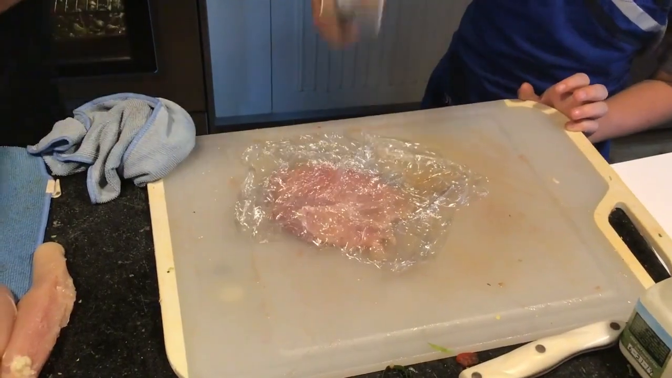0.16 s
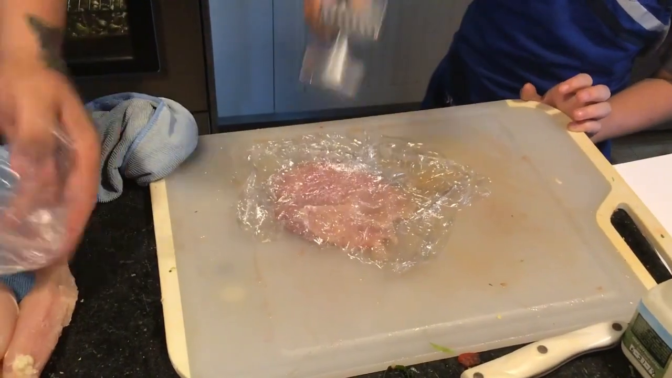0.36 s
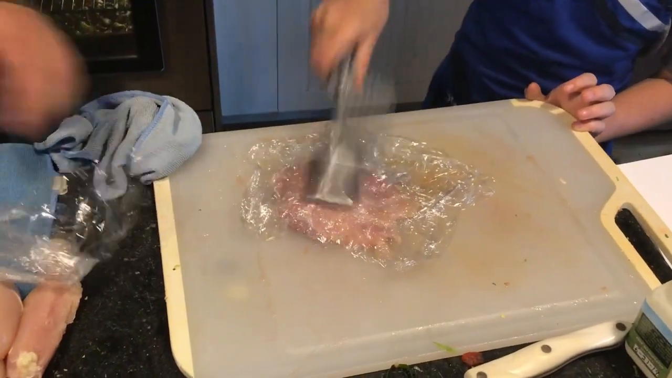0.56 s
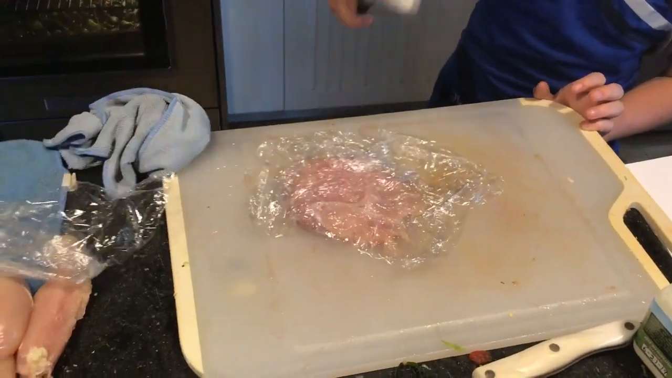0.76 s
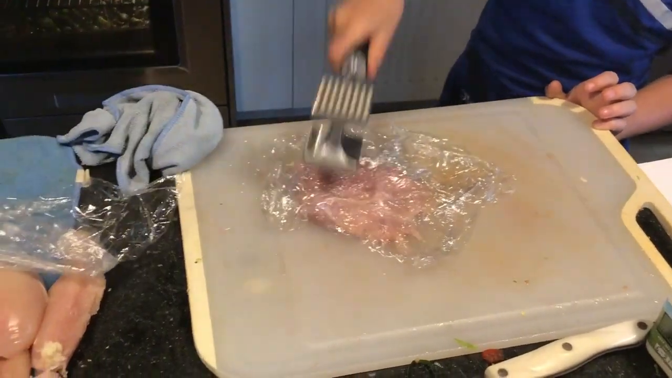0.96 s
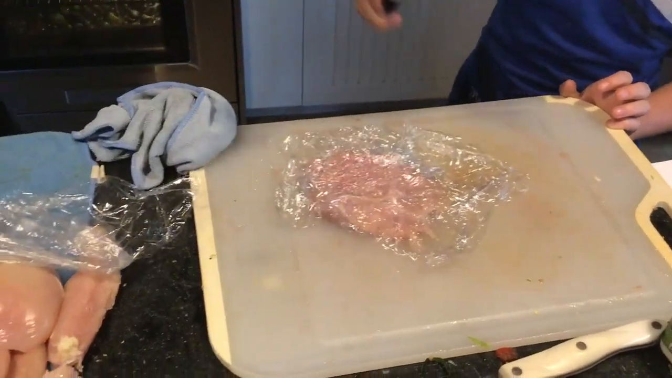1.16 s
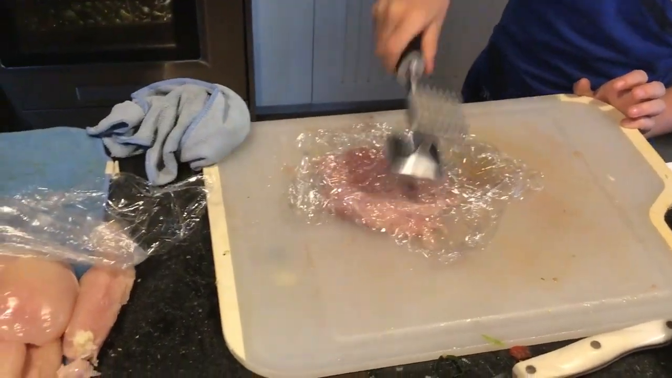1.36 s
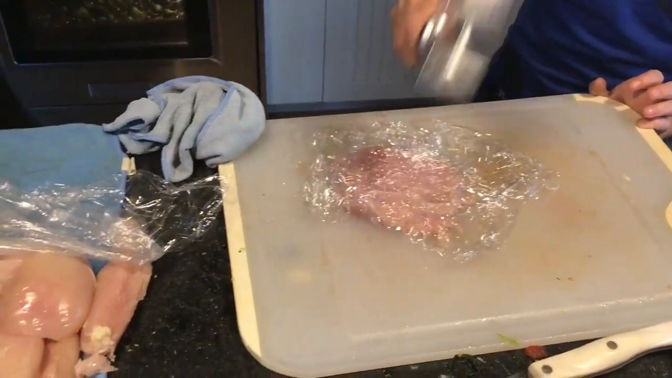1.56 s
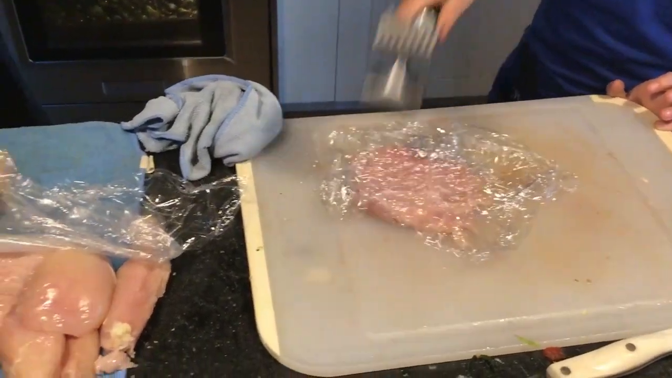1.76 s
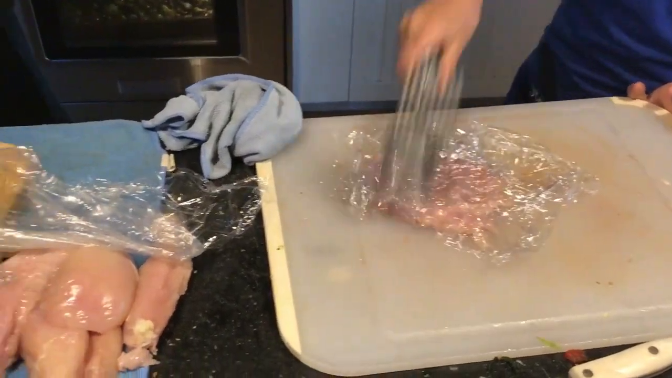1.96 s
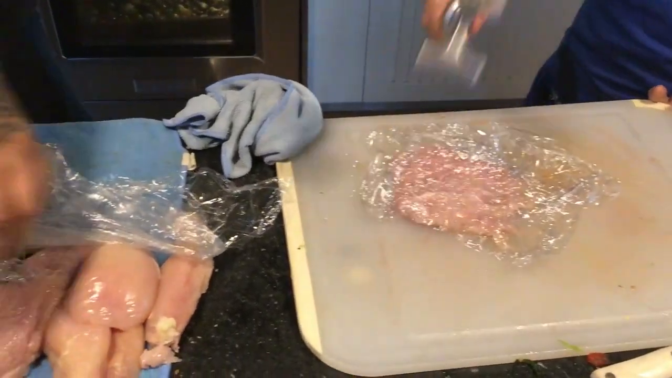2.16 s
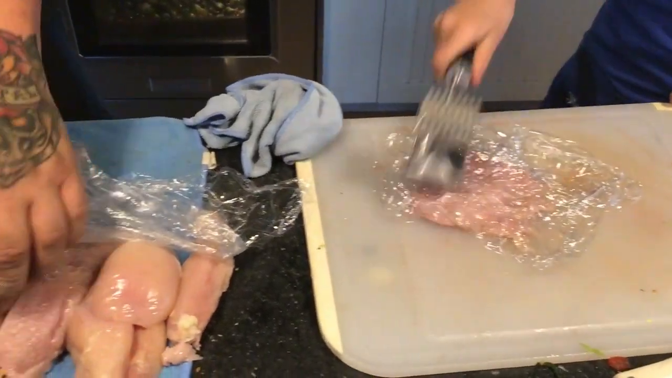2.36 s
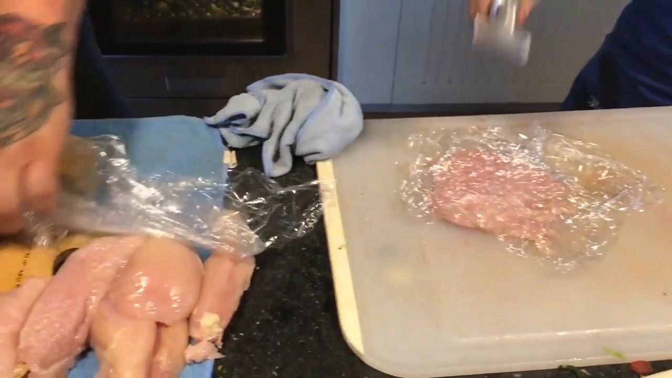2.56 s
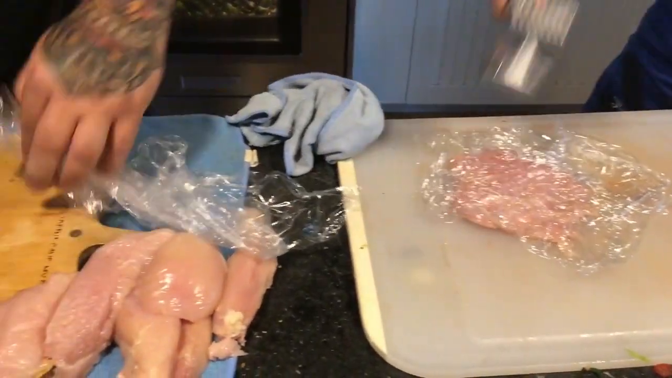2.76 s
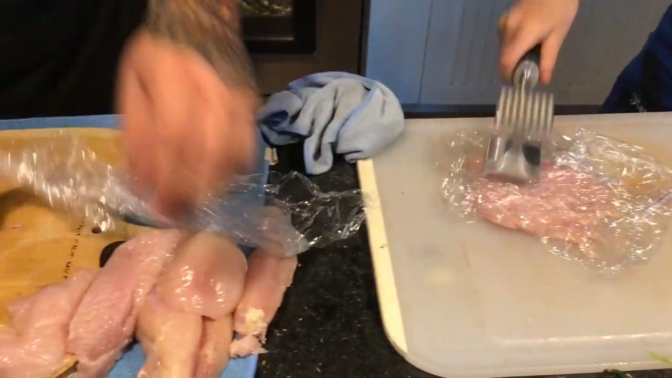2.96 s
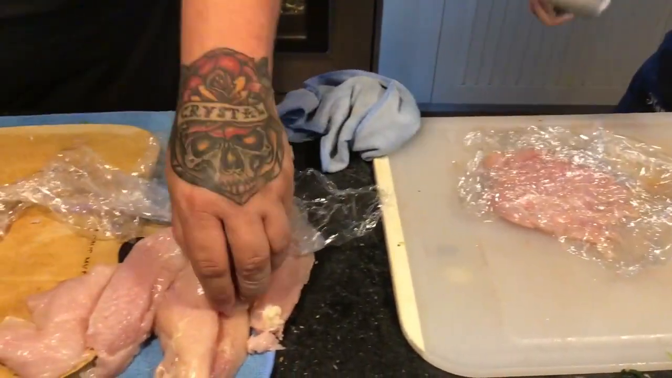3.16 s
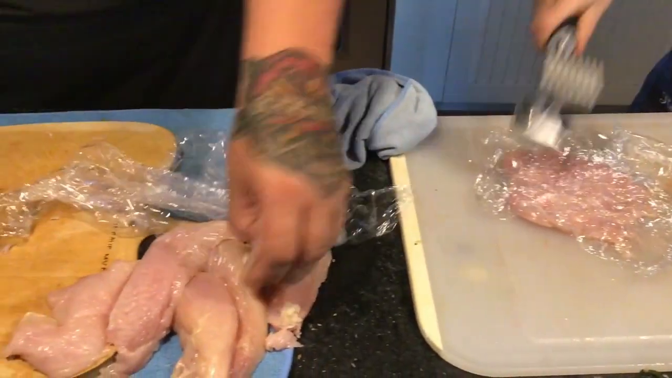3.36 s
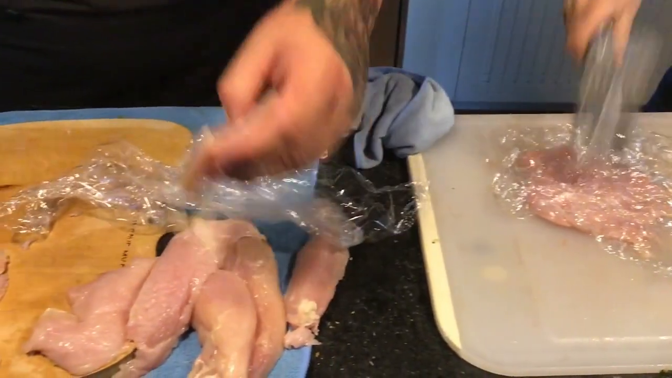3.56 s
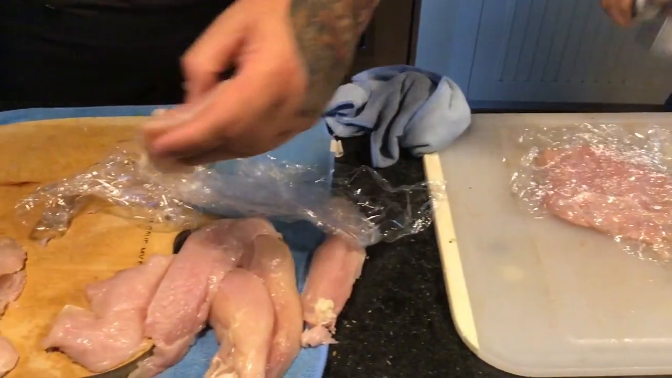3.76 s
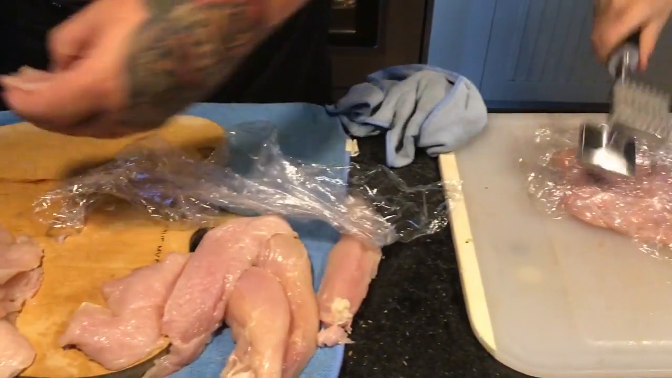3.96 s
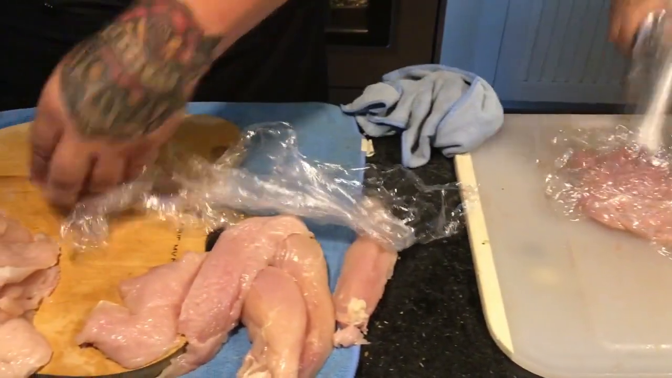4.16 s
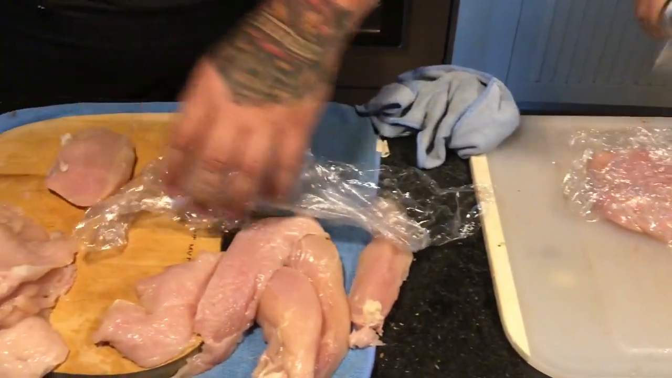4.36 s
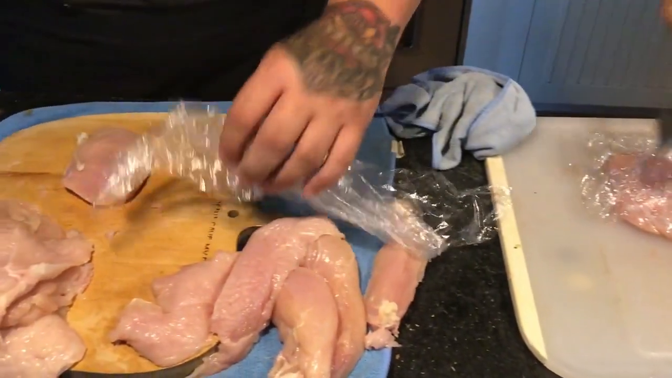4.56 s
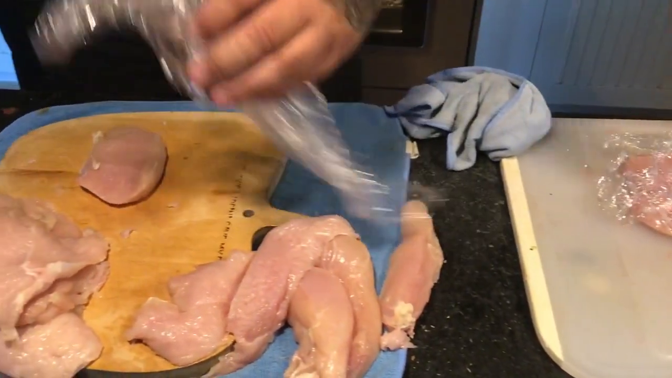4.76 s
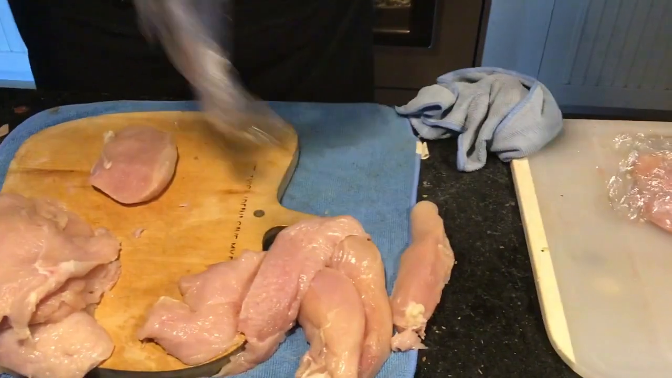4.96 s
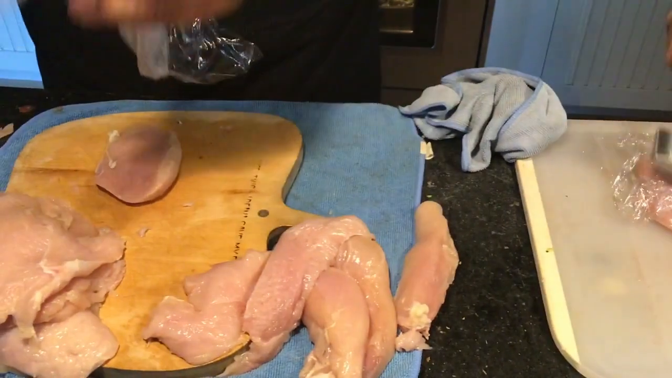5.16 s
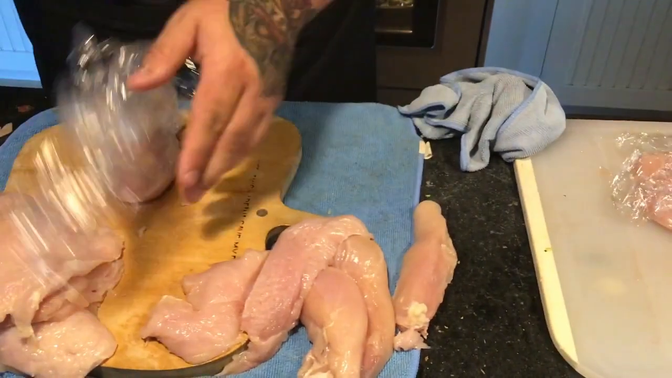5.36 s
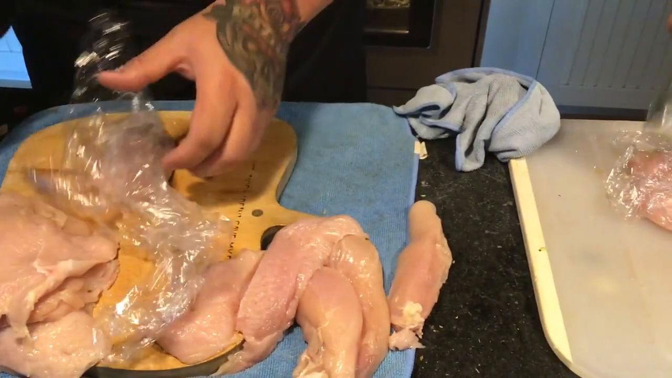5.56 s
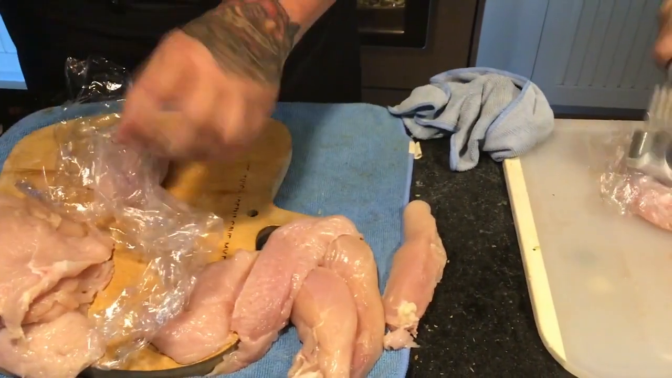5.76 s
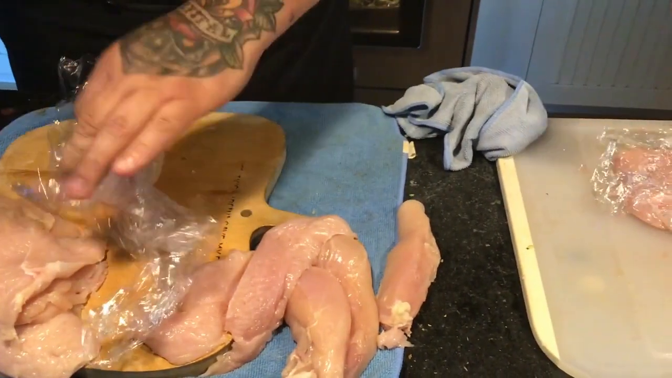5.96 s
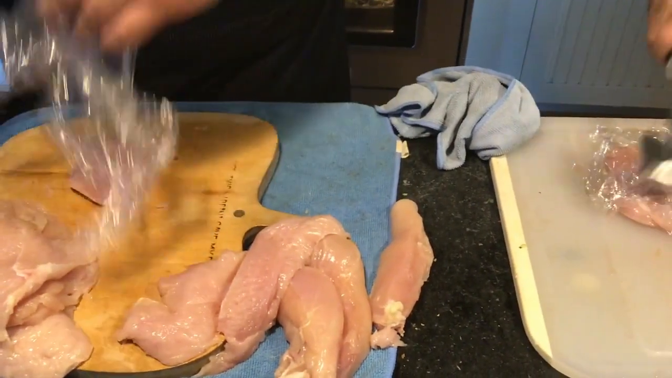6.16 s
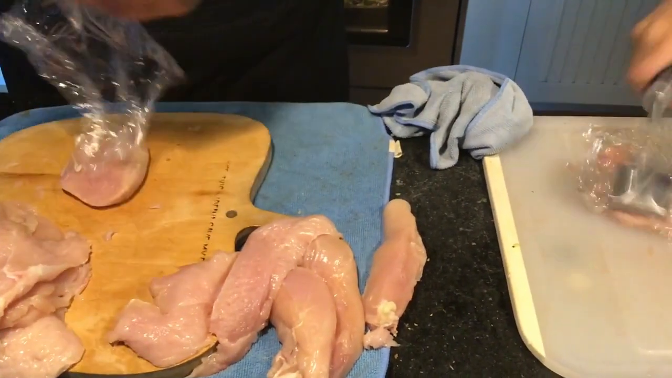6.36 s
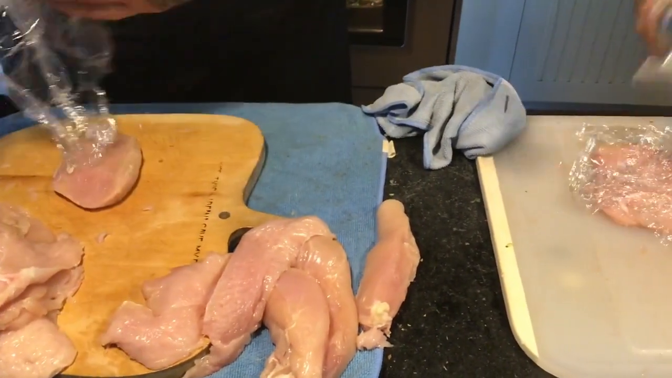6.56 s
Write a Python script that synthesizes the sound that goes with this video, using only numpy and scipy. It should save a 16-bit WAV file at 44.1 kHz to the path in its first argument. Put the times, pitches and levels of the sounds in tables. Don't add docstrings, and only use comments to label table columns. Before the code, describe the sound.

A metal mallet pounds plastic-wrapped raw meat on a plastic board about three times a second, bright wet slaps with knocks, in a small hard kitchen.

```python
import sys
import numpy as np
from scipy import signal
from scipy.io import wavfile
from scipy.ndimage import uniform_filter1d

SR = 44100
rng = np.random.default_rng(int(sys.argv[2]) if len(sys.argv) > 2 else 0)


def ratio_of_db(decibels):
    return 10 ** (np.asarray(decibels, float) / 20)


def wrap_up_sound(samples):
    columns = np.atleast_2d(samples).T
    tamed = np.clip(columns, -1, 1)
    steps = np.round(tamed * 32767).astype(np.int16)
    wavfile.write(sys.argv[1], SR, steps)


N = 291627
LEAD = 4410
EARLIER_S = -.06

# (time [s], slap peak [dB], board ring [dB], brightness [dB per octave])
SLAPS = [(EARLIER_S, -12, -16, -4), (0.2884, -5, -25, 2.5), (0.6334, -10, -17, 1), (0.9804, -2.5, -16, 4),
         (1.3387, -9, -11, 2), (1.6856, -11.5, -16, -1.5), (2.0435, -19.5, -34.5, -.5),
         (2.3844, -24, -24.5, .5), (2.7005, -22, -36, -1), (3.0202, -2, -18, 1.5), (3.3371, -11, -33, 1.5),
         (3.6476, -13, -12.5, 3), (3.9585, -14.5, -28, -1), (4.2559, 0, -12, -3.5),
         (4.557, -12.5, -11, -1.5), (4.8732, -7.5, -8.5, 2), (5.1912, 0.5, -13, -1.5),
         (5.517, -9.5, -10, -3.5), (5.8235, -7.5, -14.5, 0), (6.1472, -15.5, -22, -4),
         (6.4297, -12, -15.5, 0)]
# (time [s], board ring [dB], board pitch [Hz], crack [dB], off-centre [dB])
KNOCKS = [(EARLIER_S, -12, 740, -17, 0), (0.2925, -15.5, 740, -16.5, 6), (0.6391, -9.5, 740, -12.5, -1),
          (0.9848, -7.5, 780, -11.5, -4), (1.3421, -13, 680, -12.5, -1.5), (1.6895, -14, 737, -16.5, -2.5),
          (2.0471, -16, 757, -20.5, 0), (2.3895, -14.5, 747, -23.5, -1.5), (2.7072, -17, 715, -20, 4),
          (3.0249, -8.5, 718, -15, -3), (3.3418, -10, 710, -14, -.5), (3.6522, -10, 708, -15, -3),
          (3.9631, -20, 510, -17, 7), (4.2604, -10, 711, -16, -1), (4.5611, -11.5, 700, -15.5, -5),
          (4.8779, -9, 716, -15.5, -1.5), (5.1962, -5.5, 700, -15.5, -4.5), (5.5221, -7, 675, -13, -5),
          (5.8288, -12.5, 673, -16, 3.5), (6.1529, -15.5, 710, -22.5, 0), (6.4332, -13, 600, -16.5, -2)]
# (centre [Hz], width [Hz], level [dB])
SLAP_BANDS = [(3672, 2300, 0.5), (5500, 1400, -1), (7800, 1600, 2), (11200, 2770, -1), (13900, 2400, -12)]
# (ratio to board pitch, level [dB], t60 [s])
BOARD_NOTES = [(1.023, 2, 0.052), (1.0955, -6, 0.029)]
# (pitch [Hz], level [dB], t60 [s], woken off-centre [0..1])
PLATE_MODES = [(500, -7, .03, 0), (985, 3.5, .02, 1), (1130, 1, .028, 1), (1203, 1, .032, 1),
               (1390, -4, .015, 1), (1680, 4.5, .006, 1)]
# (pitch [Hz], level [dB], t60 [s], build-up t60 [s], left-right [dB])
COUNTER_MODES = [(86.3, -6.5, .42, 0.0054, 0), (76, -20, 0.23, 0.0074, -4.5),
                 (129.5, -2.5, 0.43, 0.1, -1.5), (141, -11.5, .25, 0.1, 2.5), (178, 1, 0.064, 0.0036, -9),
                 (177, -11, 0.66, .02, -3.5), (208.3, -4.5, 0.26, 0.049, -11.5),
                 (212, 3.5, 0.054, 0.0031, -5.5), (246, 8, .05, 0.0022, -0.5), (290, 3, 0.05, .003, 0)]
# (time [s], peak [dB])
BUMPS = [
    (2.62, -44.5),
    (5.939, -59),
]
# (frequency [Hz], level [dB per Hz], t60 [s], left-right likeness [0..1])
ROOM = [(62, -35, 0.77, 0.99), (150, -10, 0.71, 0.53), (240, 1, 0.36, 1), (330, -3, 0.35, .75),
        (520, -5.5, 0.45, 0.25), (670, -2.5, 0.44, 0.25), (1220, -6.5, 0.42, 0.65), (2000, -14.5, 0.43, .5),
        (4180, -12.5, 0.45, 0.19), (7400, -13, 0.37, 0.43), (11000, -15.5, .3, 0.53), (15900, -27, .25, .6)]
ANSWER_HZ = [400, 1400, 4000, 10000]
# (level [dB], then share [dB per dB] of slap, slap ring, brightness [dB per dB/octave],
# knock ring, crack, off-centre)
ANSWER = [(-31, .1, .08, -.1, .55, .05, .2), (-29, .02, .2, .08, -.03, .55, .15),
          (-35, .25, .01, -.12, .05, .3, .02), (-40.2, .52, .05, .55, .03, .1, -.12)]
# (centre [Hz], width [Hz], level [dB])
RATTLE_BANDS = [(3240, 400, -4), (5040, 1500, 1.5)]
# (frequency [Hz], level [dB per Hz])
FLOOR_COLOUR = [(12, -38), (20, -4.5), (142, -4), (357, 0), (780, -5.5), (976, -4.5), (2460, -15),
                (6180, -20.5), (11800, -32), (16000, -48.5)]
# (frequency [Hz], level [dB per Hz])
RUSTLE_COLOUR = [(1000, -9), (3000, -1), (5000, -5.5), (9000, -3), (13000, -13), (16000, 12.5)]
# (time [s], level [dB], hold [s])
HANDLING = [(.09, -51, .06), (.2, -57, .08), (.82, -72, .08), (1.05, -70, .15), (1.65, -76, .05),
            (2.56, -60.5, .18), (3.22, -66.5, .07), (3.6, -74, .05), (3.85, -77, .25), (4.5, -65.5, .2),
            (5.15, -74, .03), (5.38, -72, .08), (6.03, -63.5, .1), (6.35, -71, .08), (6.6, -61, .05)]
# (time [s], peak [dB], centre [Hz])
TICKS = [
    (0.2613, -39, 7100),
    (0.8928, -39, 10200),
    (0.9008, -32.5, 6090),
    (0.9234, -45.5, 3470),
    (1.9792, -34, 7800),
    (2.0036, -28.5, 5820),
    (2.0032, -36, 900),
    (4.192, -27, 2970),
    (4.1943, -34, 900),
]
# (time [s], peak [dB], centre [Hz])
CREAKS = [(1.2141, -52, 8300), (1.2387, -47.5, 9940), (1.2545, -45, 9860), (1.2985, -53, 11000),
          (2.5154, -48, 12140), (2.5214, -47.5, 8160), (3.2214, -55, 8520), (3.251, -45.5, 13500),
          (3.2654, -49, 13500), (3.2841, -46, 10750), (3.3055, -56.5, 8190), (3.4222, -50.5, 8750),
          (4.4744, -57, 8900), (4.5186, -53, 11170), (4.7999, -53.5, 12300), (5.1322, -49.5, 9470),
          (5.4727, -49.5, 13300), (6.3234, -51.5, 10100)]
# (lowest [Hz], from [s], to [s], chance per frame [0..1])
TOP_DROPOUTS = [(15000, .03, .14, .75), (14200, .05, .12, .4), (13200, .07, .12, .2)]

CONTACT_MS, CONTACT_MS_PER_DB = .8, .045
PADDED_PITCH = .88
THUMP_DB, THUMP_SHARE = -25.3, .34
NOTE_DB, NOTE_SHARE, PADDED_SHARE = -30.5, .8, .27
RATTLE_DB, RATTLE_SHARE = -6.0, -.3
GRIP_DB_PER_S, LET_GO_DB_PER_S = 95, 55
RESTING_DB = -81
FLOOR_DB, RUMBLE_DB, HUM_DB, HUM_LUMP_DB = -62.5, -66, -72, 4.0
FRAME, FRAME_START = 1024, 390
HUSH_ENDS_S, HUSH_FULL_DB, HUSH_PER_DB = .0065, -13, .045
TOP_HZ, TOP_OPEN_S = 15720, .007


def rms_one(x):
    return x / np.sqrt(np.mean(x ** 2) + 1e-20)


def at_hz(rows, hz):
    f, *columns = np.transpose(rows)
    return [np.interp(np.log(hz), np.log(f), c) for c in columns]


def butter(x, order, hz, kind):
    return signal.sosfilt(signal.butter(order, hz, kind, fs=SR, output="sos"), x)


def band(x, low_hz, high_hz):
    return butter(x, 2, [low_hz, min(high_hz, .45 * SR)], "band")


def ring(x, hz, t60):
    r = ratio_of_db(-60 / (t60 * SR))
    w = 2 * np.pi * hz / SR
    return signal.lfilter([0, np.sin(w)], [1, -2 * r * np.cos(w), r * r], x + 1e-18)


def add(track, sound, s):
    i = round(s * SR) + LEAD
    track[..., i:i + sound.shape[-1]] += sound[..., :track.shape[-1] - i]


def spread(common, own, width):
    return common + width * own * [[1], [-1]]


def half_octaves(length):
    edges = 22 * 2 ** np.arange(0, 10, .5)
    white = rng.standard_normal((2, 2, length))
    for k, (low, high) in enumerate(zip(edges, edges[1:])):
        hz = np.sqrt(low * high)
        mid, side = band(white[k % 2], low, high)
        alike = np.clip(at_hz(ROOM, hz)[2], 0, 1)
        yield hz, spread(np.sqrt(1 + alike) * mid, side, np.sqrt(1 - alike))


def steady(colour):
    return rms_one(sum(ratio_of_db(at_hz(colour, hz)[0]) * pair for hz, pair in half_octaves(N)))


def board(push, hz, upper_db):
    modes = [(hz * ratio, db, t60) for ratio, db, t60 in BOARD_NOTES]
    modes += [(f, db + upper_db * woken, t60) for f, db, t60, woken in PLATE_MODES]
    shares = rng.normal(0, 1.5, len(modes))
    return sum(ratio_of_db(db + share) * ring(push, f, t60) for (f, db, t60), share in zip(modes, shares))


def contact(t, at_ms, width_ms):
    pulse = np.exp(-.5 * ((t - at_ms) / width_ms) ** 2)
    return pulse / pulse.sum()


def slap(peak_db, contact_ms, ring_db, board_hz, bright_db):
    t = np.arange(2600) / SR * 1000 - 8
    before = np.minimum(t, 0)
    hiss = ratio_of_db(-45.5 + 5.8 * contact_ms) * np.exp(before / (0.89 * contact_ms))
    rise = np.exp(before / (0.19 * contact_ms)) + hiss
    fall = np.exp(-t / (0.68 * contact_ms)) + ratio_of_db(-25.0) * np.exp(-t / 6.9)
    shape = np.where(t < 0, rise, fall)
    common, own = rng.standard_normal((2, len(t))) * shape
    pair = spread(common, own, .35)
    crack = 0
    for hz, width, db in SLAP_BANDS:
        tilt_db = bright_db * np.log2(hz / 6000) * 0.92
        crack = crack + ratio_of_db(db + tilt_db) * band(pair, hz - width / 2, hz + width / 2)
    crack = rms_one(crack) * np.sqrt(np.mean(shape ** 2)) * ratio_of_db(peak_db + 1.5)
    push = contact(t, 0.35, 0.057 * contact_ms)
    return crack - ratio_of_db(ring_db - 5.0) * board(push, board_hz, -2.5)


def knock(ring_db, board_hz, crack_db, upper_db):
    t = np.arange(2600) / SR * 1000 - 1
    second_ms = 1.75 + 0.12 * rng.standard_normal()
    push = contact(t, -.3, .05) + .9 * contact(t, second_ms - .6, .05)
    grit = np.exp(-np.maximum(t, 0) / 0.84) * (t > -.1)
    grit = grit + 1.36 * np.exp(-np.maximum(t - second_ms, 0) / 1.66) * (t > second_ms)
    common, own = rng.standard_normal((2, len(t))) * grit
    crack = band(band(spread(common, own, 0.089), 1000, 6000), 500, 8000)
    crack = rms_one(crack) * np.sqrt(np.mean(grit ** 2))
    return ratio_of_db(ring_db - 9.5) * board(push, board_hz, upper_db) + ratio_of_db(crack_db + 1.0) * crack


def counter():
    out = np.zeros((2, N + LEAD))
    for hz, level_db, t60, build, pan_db in COUNTER_MODES:
        clicks = np.zeros(N + LEAD)
        shares = rng.normal(0, 1, len(KNOCKS))
        for (s, *_), (_, slap_db, *_), share in zip(KNOCKS, SLAPS, shares):
            add(clicks, ratio_of_db([THUMP_DB + THUMP_SHARE * slap_db + level_db + share - 3.5]), s - .003)
        swell = ring(clicks, hz, t60) - ring(clicks, hz, build)
        out += swell * ratio_of_db([[pan_db / 2], [-pan_db / 2]])
    bumps = np.zeros(N + LEAD)
    for s, db in BUMPS:
        add(bumps, ratio_of_db(db) * np.hanning(150) / 75, s)
    return out + ring(bumps, 84, 0.4) + .5 * ring(bumps, 140, .2)


def answers():
    parts = []
    for (_, *slap_row), (_, knock_db, _, crack_db, upper_db) in zip(SLAPS, KNOCKS):
        parts.append([1, *slap_row, knock_db, crack_db, upper_db])
    return np.array(ANSWER) @ np.array(parts).T


def echo_shape(t60):
    t = np.arange(round(.9 * SR / 16)) * 16 / SR
    walls = 1 + 1.0 * np.exp(-t / 0.02) + 0.79 * np.exp(-((t - .02) / 0.002) ** 2)
    return (1 - np.exp(-(t / 0.0041) ** 2)) * walls * ratio_of_db(-60 * t / t60)


def room():
    out, blows = 0, answers()
    slap_at = [(round(s * SR) + LEAD) // 16 for s, *_ in SLAPS]
    tick_at = [(round(s * SR) + LEAD) // 16 for s, *_ in TICKS]
    tick_power = ratio_of_db([2 * (db - 35.5) for _, db, _ in TICKS])
    for hz, pair in half_octaves(N):
        level_db, t60, _ = at_hz(ROOM, hz)
        place = np.interp(np.log(hz), np.log(ANSWER_HZ), np.arange(len(ANSWER_HZ)))
        blow_db = sum(max(0, 1 - abs(place - k)) * row for k, row in enumerate(blows))
        kicks = np.zeros((N + LEAD) // 16 + 1)
        np.add.at(kicks, slap_at, ratio_of_db(2 * blow_db))
        np.add.at(kicks, tick_at, tick_power / (1 + (2500 / hz) ** 2))
        power = np.maximum(signal.fftconvolve(kicks, echo_shape(t60) ** 2), 0)
        level = np.sqrt(np.interp(np.arange(LEAD, N + LEAD) / 16, np.arange(len(power)), power))
        out = out + ratio_of_db(level_db + 25.5) * level * pair
    return out


def linger():
    out = np.zeros((2, N + LEAD))
    fall = echo_shape(0.54).repeat(16)
    for knock_row, slap_row, answer_row in zip(KNOCKS, SLAPS, answers().T):
        s, knock_db, hz, *_ = knock_row
        *_, ring_db, bright_db = slap_row
        *_, high_db, _ = answer_row
        note_db = NOTE_DB + NOTE_SHARE * knock_db + PADDED_SHARE * ring_db
        rattle_db = high_db + RATTLE_DB + RATTLE_SHARE * bright_db + .25 * (knock_db + 12)
        pair = spread(*rng.standard_normal((2, len(fall))), .5)
        note = rms_one(ring(pair, .98 * hz, .05))
        rattle = sum(ratio_of_db(db) * rms_one(band(pair, f - width / 2, f + width / 2))
                     for f, width, db in RATTLE_BANDS)
        add(out, (ratio_of_db(note_db + 7.0) * note + ratio_of_db(rattle_db) * rattle) * fall, s)
    return out


def house():
    rumble = rms_one(band(rng.standard_normal(N) + .4 * rng.standard_normal((2, N)), 11, 33))
    knots = np.arange(0, N + 4000, 4000)
    lumps = np.interp(np.arange(N), knots, rng.standard_normal(len(knots)))
    hum = rms_one(band(rng.standard_normal(N) + .2 * rng.standard_normal((2, N)), 42, 80))
    return ratio_of_db(RUMBLE_DB) * rumble + ratio_of_db(HUM_DB + HUM_LUMP_DB * lumps) * hum


def rustle():
    t = np.arange(N) / SR
    power = ratio_of_db(2 * RESTING_DB)
    for s, db, hold in HANDLING:
        grip_db = GRIP_DB_PER_S * np.maximum(s - t, 0)
        let_go_db = LET_GO_DB_PER_S * np.maximum(t - s - hold, 0)
        power = power + ratio_of_db(2 * (db - grip_db - let_go_db))
    grains = ratio_of_db(1.3 * np.minimum(rng.exponential(1, N // 64 + 1), 5)).repeat(64)[:N]
    return np.sqrt(power) * ratio_of_db(2.0) * rms_one(steady(RUSTLE_COLOUR) * grains)


def ticks():
    out = np.zeros(N + LEAD)
    fall = np.exp(-np.arange(400) / SR / 0.0012)
    for s, db, hz in TICKS + CREAKS:
        crease = band(rng.standard_normal(400) * fall, 0.46 * hz, 2.0 * hz)
        add(out, ratio_of_db(db - 17.5) * rms_one(crease), s)
    return out


def scene():
    near = ticks() + linger()
    for (s, slap_db, ring_db, bright_db), (s2, knock_db, hz, crack_db, upper_db) in zip(SLAPS, KNOCKS):
        contact_ms = CONTACT_MS - CONTACT_MS_PER_DB * slap_db
        add(near, slap(slap_db, contact_ms, ring_db, PADDED_PITCH * hz, bright_db), s - .0083)
        add(near, knock(knock_db, hz, crack_db, upper_db), s2 - .001)
    near = butter(near, 2, 220, "high")
    blows = butter((near + counter())[:, LEAD:] + room(), 4, 70, "high")
    return blows + rustle() + ratio_of_db(FLOOR_DB) * steady(FLOOR_COLOUR) + house()


def hush_before_blows(x):
    t = np.arange(N) / SR
    hush = np.zeros(N)
    for s, db, *_ in SLAPS:
        start = ((s * SR - FRAME_START) // FRAME * FRAME + FRAME_START) / SR
        depth = np.clip(1 + HUSH_PER_DB * (db - HUSH_FULL_DB), 0, 1)
        hush += (t > start) * (t < s - HUSH_ENDS_S) * depth
    highs = x - signal.sosfiltfilt(signal.butter(2, 900, fs=SR, output="sos"), x)
    return x - .9 * uniform_filter1d(hush, size=40) * highs


def open_top_at_blows(x):
    t = np.arange(N) / SR
    top = x - signal.sosfiltfilt(signal.ellip(10, .2, 40, TOP_HZ, fs=SR, output="sos"), x)
    is_open = sum((abs(t - s) < TOP_OPEN_S) * 1. for s, *_ in SLAPS)
    return x - top * (1 - uniform_filter1d(is_open, size=200))


def drop_top_after_blows(x):
    frame_s = (np.arange(N // FRAME + 2) * FRAME + FRAME_START - FRAME / 2) / SR
    for hz, a, b, chance in TOP_DROPOUTS:
        due = sum((frame_s > s + a) * (frame_s < s + b) for s, *_ in SLAPS)
        due = due * (rng.random(len(frame_s)) < chance)
        gate = due.repeat(FRAME)[FRAME - FRAME_START:][:N] * 1.
        top = signal.sosfiltfilt(signal.ellip(8, .2, 40, hz, "high", fs=SR, output="sos"), x)
        x = x - top * uniform_filter1d(gate, size=400)
    return x


def top_cut(x):
    return signal.sosfilt(signal.butter(12, 16480, fs=SR, output="sos"), x)


def record(dry):
    mix = butter(hush_before_blows(dry), 8, 15900, "low")
    mix = drop_top_after_blows(open_top_at_blows(mix))
    return top_cut(np.clip(mix, -1, 1))


dry = scene()
out = record(dry)
wrap_up_sound(out)
```